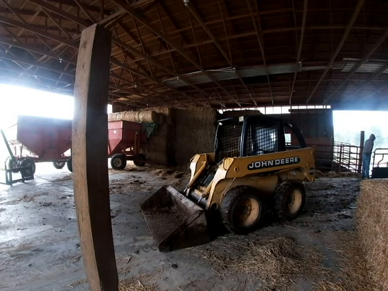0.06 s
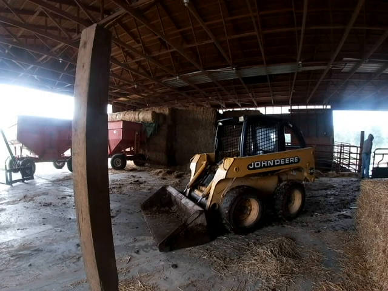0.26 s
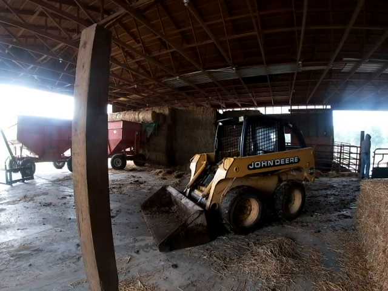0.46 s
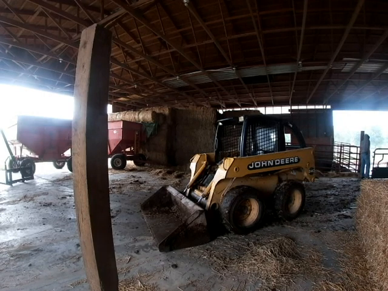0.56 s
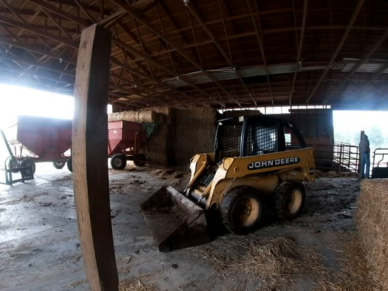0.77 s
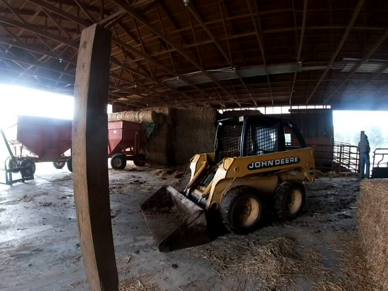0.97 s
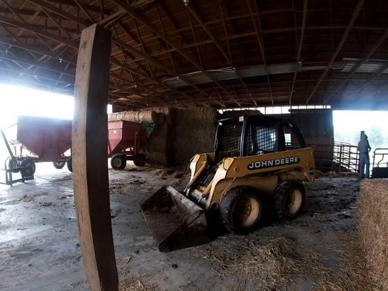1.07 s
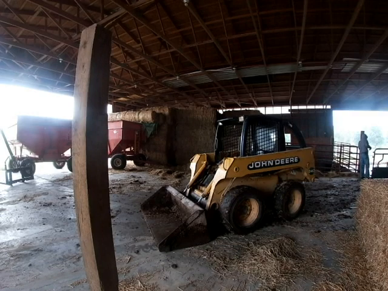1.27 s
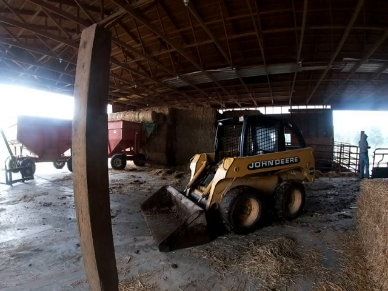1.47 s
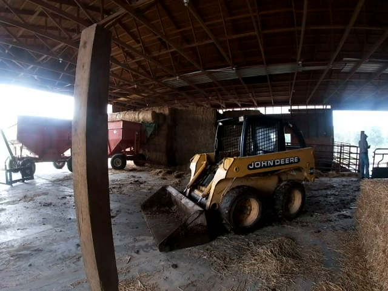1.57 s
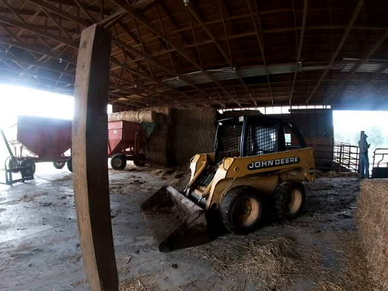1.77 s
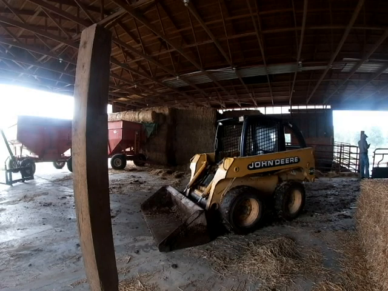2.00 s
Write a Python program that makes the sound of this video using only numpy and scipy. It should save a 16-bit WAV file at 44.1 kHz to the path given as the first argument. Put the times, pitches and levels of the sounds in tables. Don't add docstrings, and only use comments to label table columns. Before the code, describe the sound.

One long cow moo under a big roof: breathy nostril whistle and rising hum, open-mouthed bellow, abrupt falling end. Soft insect hiss and low rumble sit behind, dipping as the microphone's automatic volume reacts.

```python
import sys
import numpy as np
from scipy import signal
from scipy.fft import rfft, irfft, next_fast_len
from scipy.io import wavfile

SR = 44100
rng = np.random.default_rng(int(sys.argv[2]) if len(sys.argv) > 2 else 0)


def magnitude_from_level(level_db):
    exponent = np.asarray(level_db, float) / 20
    return 10 ** exponent


def bounce(signal):
    frames = np.transpose(np.atleast_2d(signal))
    limited = np.clip(frames, -1, 1)
    pcm = np.round(limited * 32767).astype(np.int16)
    wavfile.write(sys.argv[1], SR, pcm)


N = 89743

# time in seconds, pitch in Hz, effort in dB,
# mouth opening from 0 to 1, roughness (breath against voice) in dB.
MOO = [(.12, 96.1, -67.5, 0.9, -2), (.25, 103.2, -60, 0.64, -2.5), (.4, 119, -52, 0.31, 1.5),
       (.5, 140.1, -51.5, 0.58, -1.5), (.62, 159.5, -42.5, 0.73, -18.5), (.69, 164.9, -42.5, 0.67, -6),
       (.74, 179.9, -34.5, 0.8, -2.5), (.81, 198.3, -32.5, 0.69, -15.5), (.89, 201.7, -33.5, 1, -8),
       (1.05, 207.5, -31, 0.7, -6.5), (1.19, 212.9, -28.5, 0.95, -10.5), (1.26, 215.6, -31.5, 0.88, -5.5),
       (1.6, 217.5, -33, 0.97, -8), (1.74, 214.6, -31.5, 1, -21.5), (1.8, 206.7, -30.5, 1, -18),
       (1.865, 199.8, -30.5, 0.69, -6.5), (1.91, 191.3, -34.5, 0.93, -4), (1.96, 171.8, -55, 0.1, 11.5)]


def rms_one(x):
    return x / np.sqrt(np.mean(x ** 2) + 1e-20)


def in_time(rows):
    seconds, *columns = np.transpose(rows)
    return [np.interp(np.arange(N) / SR, seconds, column) for column in columns]


def drift(rate):
    step = 40
    r = np.exp(-2 * step * np.pi * rate / SR)
    steps = rng.standard_normal(N // step + 2002)
    slow = signal.lfilter([1], [1, -2 * r, r * r], steps)[2000:]
    return np.interp(np.arange(N) / step, np.arange(len(slow)), rms_one(slow))


def peaks(table, hz):
    return np.sqrt(sum((magnitude_from_level(db) / (1 + ((hz - f) / (w / 2)) ** 2)) ** 2 for f, w, db in table))


def shaped(x, gain_at):
    size = next_fast_len(N)
    hz = np.arange(size // 2 + 1) * SR / size
    return irfft(rfft(x, size) * gain_at(hz), size)[:N]


def noise_band(hz, width):
    return rms_one(shaped(rng.standard_normal(N), lambda f: peaks([(hz, width, 0)], f)))


def background():
    # frequency in Hz, level of the yard noise in dB.
    yard_curve = [(20, -32.5), (55, -22), (110, -3), (270, -4.5), (350, -10), (3300, -24), (7000, -33),
                  (13500, -57)]
    # centre in Hz, width in Hz, level in dB.
    bands = [
        (70, 20, -54.5),
        (5060, 790, -61),
        (5450, 250, -61.5),
        (6100, 600, -70),
        (6750, 180, -68),
        (9800, 400, -96.5),
    ]
    yard_db, tick_s, tick_db, tick_hz = -52, .463, -46, 7000
    curve_hz, curve_db = np.transpose(yard_curve)

    def yard_gain(hz):
        return magnitude_from_level(np.interp(np.log(hz + 1), np.log(curve_hz), curve_db))

    yard = rms_one(shaped(rng.standard_normal(N), yard_gain))
    out = magnitude_from_level(yard_db + 1.0 * drift(3.)) * yard
    for hz, width, level_db in bands:
        out = out + magnitude_from_level(level_db + 1.5 * drift(12.)) * noise_band(hz, width)

    since_tick = np.maximum(np.arange(N) / SR - tick_s, 0)
    click = (since_tick > 0) * rng.standard_normal(N) * np.exp(-since_tick / .0015)
    tick_band = signal.butter(4, [tick_hz * .6, tick_hz * 1.2], "band", fs=SR, output="sos")
    return out + magnitude_from_level(tick_db) * signal.sosfilt(tick_band, click)


def voice(pitch, rough_db, throats, shares, first, count):
    # centre in Hz, width in Hz, depth from 0 to 1.
    hollows = [(869, 44, .8), (617, 66, 0.6), (479, 46, 0.4), (1460, 40, 0.51)]
    jitter, hoarse_jitter = 0.0021, 0.0191
    wobble_db, wobble_per_s = 4, 11
    evening = 0.79

    tremor = (jitter + hoarse_jitter * magnitude_from_level(rough_db) ** 2) * drift(19.0)
    turns = np.cumsum(pitch * (1 + tremor)) / SR
    at = np.arange(N)
    coarse = slice(None, None, 64)
    tone, power = 0, 0
    for k in range(first, count + 1):
        hz = k * pitch[coarse]
        gain = sum(share[coarse] * peaks(throat, hz) for throat, share in zip(throats, shares))
        for f, w, depth in hollows:
            gain = gain * (1 - np.clip(depth, 0, 1) / (1 + ((hz - f) / (w / 2)) ** 2))
        power = power + gain ** 2 / 2
        gain = np.interp(at, at[coarse], gain) * magnitude_from_level(wobble_db * drift(wobble_per_s))
        tone = tone + gain * np.sin(2 * np.pi * (k * turns + rng.random()))
    loudness = np.sqrt(power ** evening * np.mean(power) ** (1 - evening))
    tone = tone / np.interp(at, at[coarse], loudness)

    puffs = rng.standard_normal(N) * (1 + 1.8 * np.sin(2 * np.pi * turns))
    breathy = 0
    for throat, share in zip(throats, shares):
        wider = [(f, 3.0 * w, db) for f, w, db in throat]
        coloured = shaped(puffs, lambda hz: peaks(throat, hz) + .3 * peaks(wider, hz))
        breathy = breathy + share * rms_one(coloured)
    return tone + magnitude_from_level(rough_db) * breathy, turns


def moo():
    # centre in Hz, width in Hz, level in dB.
    open_throat = [(376.6, 110, -24), (431.4, 26, -1), (866, 37, -1), (1011, 53, 5), (1110, 360, -7.5),
                   (1186, 450, 2), (1607, 570, -1), (2026, 630, -3), (2643, 250, -2.5), (3040, 160, -14.5),
                   (3706, 160, -24), (4280, 330, -26), (5120, 700, -27.5)]
    shut_throat = [(324.7, 65, 28), (535, 220, 15.5), (796, 290, 15.5), (1730, 55, 3.5), (2870, 450, -3),
                   (4350, 900, -36)]
    # time in seconds, chest in dB, ring in dB.
    tones = [(.45, -66.5, -80), (.58, -38.5, -68), (.69, -38.5, -55), (.73, -37, -47.5), (.81, -25.5, -44),
             (.9, -26, -42.5), (1.02, -34, -32.5), (1.075, -17, -33), (1.13, -18.5, -32.5),
             (1.18, -16, -23.5), (1.38, -15.5, -23), (1.47, -17, -33.5), (1.56, -17.5, -21.5),
             (1.75, -17.5, -24), (1.8, -27, -42.5), (1.85, -24, -25.5), (1.9, -48, -23), (1.94, -40, -43.5)]
    # middle in seconds, length in seconds, multiple of the pitch, level in dB.
    flares = [
        (.75, .05, 6, -34),
        (.825, .08, 5, -26),
        (1.795, .04, 5, -30),
        (1.857, .05, 5, -24),
    ]
    strain_hz, strain_from_s, strain_db_per_s, strain_top_db = 3360, 1, 22.5, 8

    t = np.arange(N) / SR
    pitch, effort_db, mouth, rough_db = in_time(MOO)
    chest_db, ring_db = in_time(tones)
    mouth = np.clip(mouth, 0, 1)
    throats, shares = [open_throat, shut_throat], [mouth, 1 - mouth]
    upper, turns = voice(pitch, rough_db, throats, shares, first=2, count=28)

    def strain_band(hz):
        return 1 / (1 + (strain_hz / (hz + 1)) ** 12) / (1 + (hz / 6000) ** 12)

    strain_db = np.clip(strain_db_per_s * (t - strain_from_s), 0, strain_top_db)
    upper = upper + (magnitude_from_level(strain_db) - 1) * shaped(upper, strain_band)

    chest = magnitude_from_level(chest_db) * np.sin(2 * np.pi * turns)
    ring = magnitude_from_level(ring_db) * np.sin(2 * np.pi * (3 * turns + .5))
    for middle, length, k, db in flares:
        swell = np.exp(-((t - middle) / (length / 2)) ** 2)
        ring = ring + magnitude_from_level(db) * swell * np.sin(2 * np.pi * k * turns)
    return magnitude_from_level(effort_db) * upper, np.sqrt(2) * chest, np.sqrt(2) * ring


def breath():
    # start in seconds, length in seconds, centre in Hz, width in Hz, level in dB.
    whistles = [
        (0.2, 0.45, 2418, 70, -59.5),
        (0.244, 0.27, 1864, 115.6, -56.5),
        (0.322, 0.33, 1656, 70, -53),
    ]
    # centre in Hz, width in Hz, level in dB.
    air_bands = [(6090, 1800, -29), (7740, 1100, -32), (9440, 1500, -40.5), (11900, 2000, -56.5)]
    air_follows, air_ref_db = 0.68, -31

    t = np.arange(N) / SR
    _, effort_db, mouth, _ = in_time(MOO)
    nose = 0
    for start, length, hz, width, db in whistles:
        swell = np.sin(np.pi * np.clip((t - start) / length, 0, 1)) ** .5
        nose = nose + magnitude_from_level(db) * swell * noise_band(hz, width)
    air = sum(magnitude_from_level(db) * noise_band(hz, width) for hz, width, db in air_bands)
    air_db = air_ref_db + air_follows * (effort_db - air_ref_db)
    return nose + np.clip(mouth, 0, 1) * magnitude_from_level(air_db) * air


def dull_low(rows):
    # centre in Hz, width in Hz, level in dB.
    dull_throat = [(165, 66, -6), (287, 82, 20.5), (500, 150, -40)]
    pitch, level_db, rough_db = in_time(rows)
    sound, _ = voice(pitch, rough_db, [dull_throat], [np.ones(N)], first=1, count=4)
    return magnitude_from_level(level_db) * sound


def far_cow():
    # time in seconds, pitch in Hz, level in dB, roughness in dB.
    course = [
        (.82, 145, -69.5, -21.5),
        (.92, 150.7, -48, -17.5),
        (1.01, 165, -33.5, -20.5),
        (1.14, 170.7, -40.5, -17),
        (1.22, 161.6, -50.5, 8),
        (1.36, 142.2, -42, 4),
        (1.5, 142.9, -51, 1.5),
        (1.62, 146.5, -49, -6),
        (1.7, 133, -95, 6),
    ]
    return dull_low(course)


def grunt():
    # time in seconds, pitch in Hz, level in dB, roughness in dB.
    course = [
        (1.86, 198, -70, -4.),
        (1.89, 186, -33, -4.),
        (1.925, 170, -30, -2.),
        (1.947, 160, -40, -2.),
        (1.96, 155, -26, -4.),
        (1.972, 152, -40, 0.),
        (2.0, 148, -44, 0.),
        (2.03, 145, -55, 0.),
    ]
    return dull_low(course)


def barn(x):
    low_t60_s, top_t60_s = 0.83, 1
    echo_db, first_echo_s = -7, 0.017
    t = np.arange(N) / SR
    dull = rms_one(signal.lfilter([.2], [1, -.8], rng.standard_normal(N)))
    bright = 0.34 * rng.standard_normal(N)
    tail = dull * magnitude_from_level(-60 * t / low_t60_s) + bright * magnitude_from_level(-60 * t / top_t60_s)
    tail = tail * (t > first_echo_s)
    return magnitude_from_level(echo_db) * signal.fftconvolve(x, tail / np.sqrt(np.sum(tail ** 2)))[:N]


def automatic_volume(cows):
    from_level_db, share, memory_s = -26.5, .4, 0.16
    r = np.exp(-1 / (memory_s * SR))
    level_db = 10 * np.log10(signal.lfilter([1 - r], [1, -r], cows ** 2) + 1e-12)
    return magnitude_from_level(-share * np.maximum(level_db - from_level_db, 0))


def scene():
    upper, chest, ring = moo()
    other = breath() + far_cow() + grunt()
    to_roof = upper + magnitude_from_level(-13) * ring + magnitude_from_level(-16) * chest + other
    cows = upper + chest + ring + other + barn(to_roof)
    return (cows + background() * automatic_volume(cows))[None]


def band_limit(x):
    return signal.sosfilt(signal.butter(12, 14100, fs=SR, output="sos"), x)


def record(dry):
    low_cut = signal.butter(2, 65, "high", fs=SR, output="sos")
    return band_limit(signal.sosfilt(low_cut, dry))


dry = scene()
out = record(dry)
bounce(out)
```